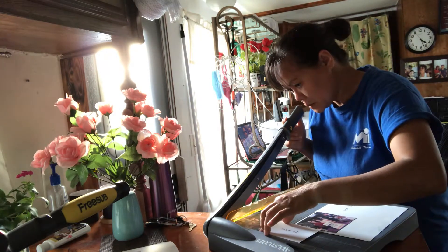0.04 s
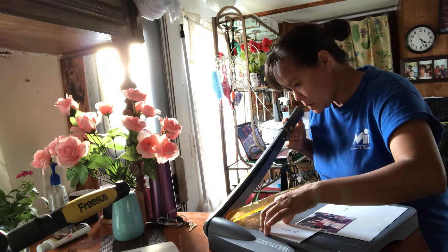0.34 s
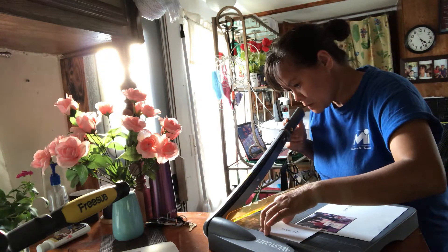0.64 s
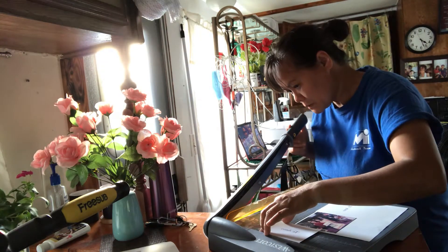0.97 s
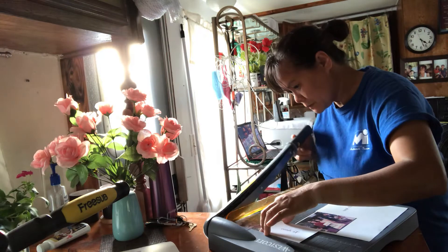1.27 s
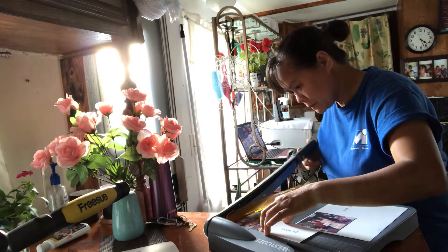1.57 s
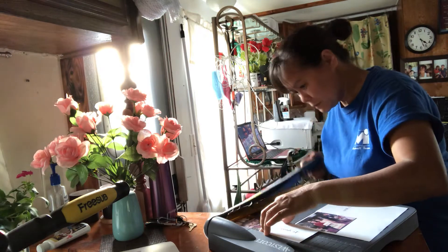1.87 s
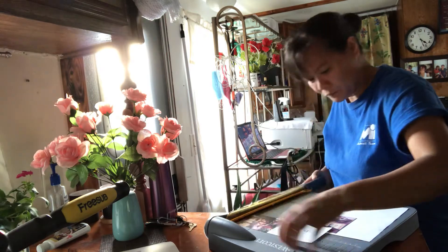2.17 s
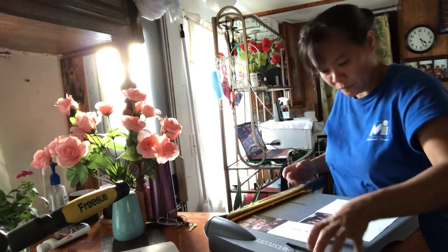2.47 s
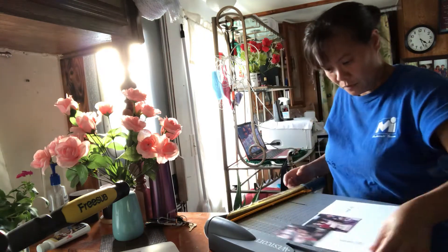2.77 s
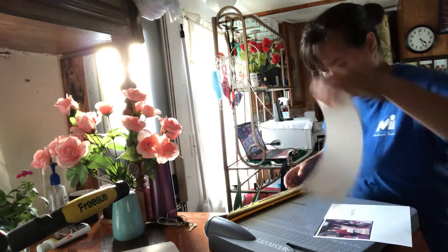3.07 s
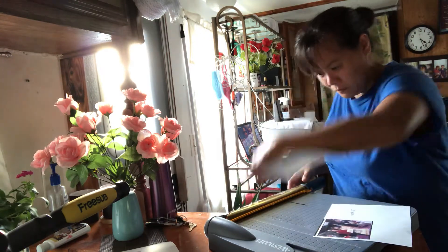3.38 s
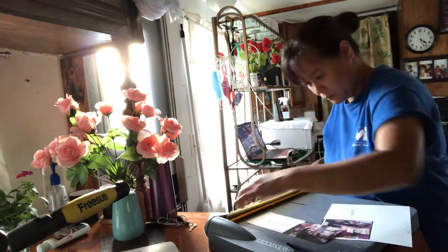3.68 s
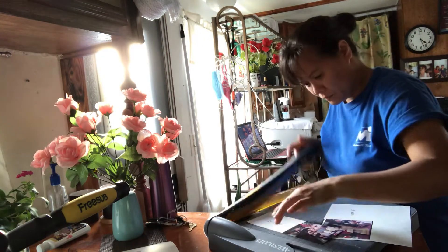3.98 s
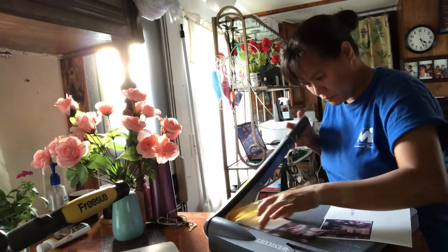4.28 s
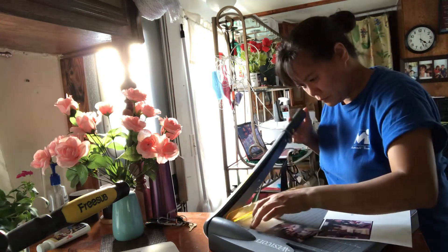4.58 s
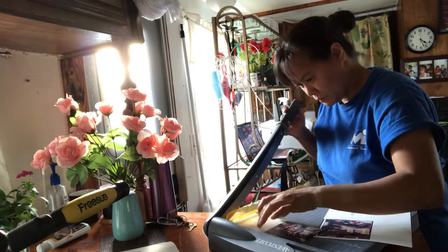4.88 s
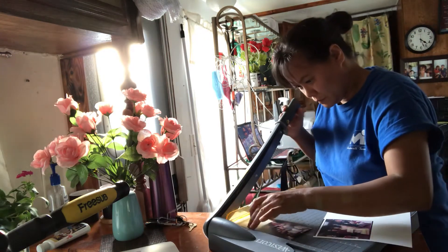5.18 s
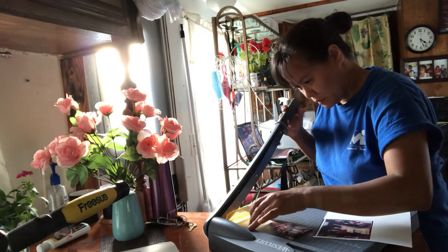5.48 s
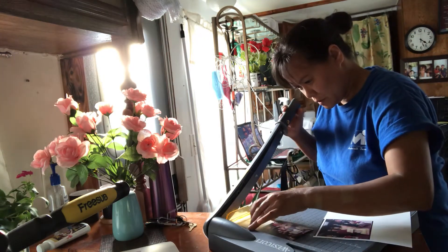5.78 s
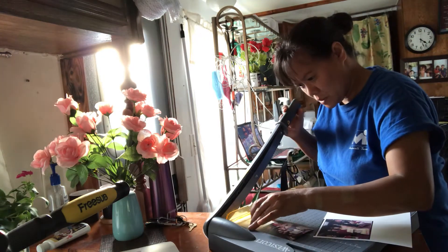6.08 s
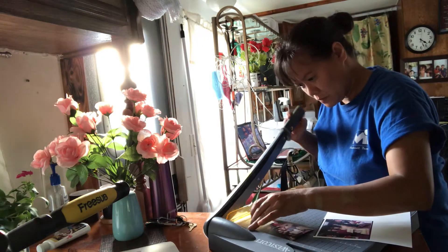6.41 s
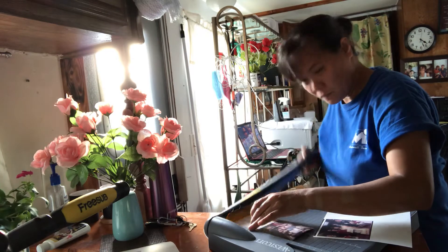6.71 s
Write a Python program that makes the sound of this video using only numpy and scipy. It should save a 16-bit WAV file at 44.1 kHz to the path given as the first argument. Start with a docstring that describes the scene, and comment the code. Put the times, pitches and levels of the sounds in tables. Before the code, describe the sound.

Paper crunches softly under a trimmer blade that squeaks and bangs shut twice, with a sheet sliding in between, in a quiet room.

```python
"""Guillotine paper trimmer, two cuts

A trimmer on a wooden table in a small, quiet room. Paper fibres snap under the blade and ring the
plastic bed; then steel scrapes and squeals on steel and the arm slams on its stop. Between the cuts
a sheet slides away, the arm is raised and small knocks sound as the next sheet is lined up."""
import sys
import numpy as np
from scipy import signal
from scipy.fft import rfft, irfft, next_fast_len
from scipy.io import wavfile

SR = 44100
rng = np.random.default_rng(int(sys.argv[2]) if len(sys.argv) > 2 else 0)


def log_audio(samples):
    """Write samples as a 16-bit WAV file to the path given in sys.argv[1]."""
    # one column per channel
    frames = np.atleast_2d(samples).T
    # limit to full scale, then quantise
    limited = np.clip(frames, -1, 1)
    pcm = np.round(limited * 32767).astype(np.int16)
    wavfile.write(sys.argv[1], SR, pcm)


N = 302085
T = np.arange(N) / SR
HIT_T = T[:SR // 2]  # half a second for each one-shot
FREQS = np.maximum(np.arange(8193) * SR / 16384, 1)

# Blade shearing paper: start_s, attack_s, length_s, level_db, rise_db, treble_db
CUT_STROKES = [(0.72, 0.087, 0.36, -51.5, -6.5, -7.5), (1.012, 0.12, .55, -41.5, 9, -8.5),
               (1.725, 0.015, .078, -36, 2, -4.5), (6.427, 0.014, 0.27, -40.5, 14.5, -4)]
# Raised or poised blade brushing the bed: start_s, attack_s, length_s, level_db, rise_db, treble_db
BRUSH_STROKES = [(3.948, 0.028, 0.32, -50.5, -13, -13.5), (4.275, 0.027, 0.1, -53.5, -7, -12),
                 (4.47, 0.076, 0.24, -60, 4, -18), (6.275, 0.035, .15, -67, 2, -3)]
# Steel edge on the steel bar: start_s, attack_s, length_s, level_db, rise_db, treble_db
SCRAPE_STROKES = [(1.854, 0.017, 0.17, -46.5, 8, -8), (2.005, 0.026, 0.096, -35, 6, -2),
                  (3.571, 0.0086, 0.053, -44, -9.5, -6), (3.735, 0.034, 0.12, -39, 11.5, -2),
                  (3.889, 0.023, 0.05, -46.5, 13.5, -10), (6.745, 0.022, .085, -37, -3, 5.5)]
# Squeals of the edge: start_s, length_s, first_hz, last_hz, level_db
EDGE_SQUEALS = [(1.92, .018, 1870, 1920, -40.5), (1.945, 0.019, 1960, 2000, -37),
                (1.991, .035, 1850, 1950, -44.5), (2.028, .05, 1560, 1635, -36),
                (2.029, .022, 4004, 3980, -33), (2.065, .036, 2150, 2145, -31),
                (3.572, 0.028, 903, 913, -36), (3.571, 0.017, 1850, 1920, -33),
                (3.761, 0.04, 893, 890, -35.5), (3.844, 0.028, 1882, 1950, -29),
                (6.76, 0.026, 1910, 1710, -24.5), (6.775, .026, 4330, 4210, -29),
                (6.781, 0.025, 1480, 1450, -24.5), (6.804, 0.032, 1080, 950, -31)]
# Arm hitting its stop and rattling: start_s, crack_db, thud_db, crack_rise_s
ARM_HITS = [(2.096, -13.5, -20.5, 0.0012), (2.108, -24, -20, 0.0058), (2.13, -18, -25.5, .004),
            (2.175, -47, -35, 0.0053), (2.228, -63, -43.5, .006), (6.833, -13.5, -17.5, 0.00042)]
# Fingers, sheet and hinge: start_s, level_db, tilt_db_per_octave, t60_s, hum_db
LIGHT_KNOCKS = [(1.844, -23, -2.5, 0.026, -51), (2.47, -26, -5.5, 0.035, -58),
                (3.113, -40.5, -8, 0.042, -76.5), (3.134, -39, -7, 0.03, -82),
                (3.307, -39.5, -10, 0.047, -78), (3.577, -38.5, 7, 0.039, -52.5),
                (3.619, -45, 6, 0.15, -57), (3.725, -44, 2, 0.12, -51), (4.126, -29.5, -2.5, 0.051, -44.5),
                (4.282, -30.5, -1.5, 0.039, -44), (4.366, -36.5, -14, 0.035, -67),
                (4.415, -39.5, -0.5, 0.077, -59), (4.661, -29, 6, 0.095, -46.5),
                (4.967, -55.5, -10, 0.33, -76), (5.285, -56, -7.5, 0.12, -78)]
# Crisp paper ticks: start_s, level_db, centre_hz, t60_s
PAPER_TICKS = [(0.984, -59, 14000, .08), (4.39, -65, 11000, .04), (5.477, -57, 6100, 0.062)]
# Sheet sliding over the bed: fastest_s, half_length_s, level_db, treble_db
SHEET_SLIDES = [(2.63, 0.11, -57, 7.5), (2.842, .055, -54, -9.5), (2.942, .05, -59.5, -5.5),
                (3.084, .028, -57, -18), (3.454, 0.22, -69, -19), (4.262, 0.14, -66.5, 1.5),
                (4.577, 0.067, -73, 1), (4.988, 0.11, -72.5, 5.5)]
# Distant noise dying away: time_s, rumble_db, rush_db
DISTANT_FADE = [(0, -49, -59.5), (2.5, -58, -62), (4.6, -61, -66), (6.85, -62.5, -79.5)]

# Resonances of the bed, the blade and the knocked shell: centre_hz, width_hz, level_db
BED_RESONANCES = [(344.7, 28, 2), (678, 35, 3), (882, 6.8, 0.5), (1456, 124, -6.5), (1797, 97, -6.5),
                  (2310, 65, -10), (2704, 57, -10.5), (3088, 145, -11.5), (3860, 85, -10), (4390, 240, -17),
                  (5530, 62, -15), (5980, 220, -15.5), (6230, 26, -20), (6590, 37, -13.5), (7080, 170, -20),
                  (7670, 50, -21), (8050, 50, -26)]
BLADE_RESONANCES = [(724, 20, -1.5), (1114, 74, -0.5), (1473, 28, -1), (1780, 62, -2.5), (1833, 67, 0.5),
                    (2220, 29, -4), (2418, 53, -5), (2830, 45, -5), (3200, 67, -9), (3770, 45, -18.5),
                    (3820, 53, -21.5), (3970, 38, -6.5), (4450, 65, -12), (5720, 26.6, -11.5),
                    (5930, 28.5, -23.5), (7120, 96.4, -17.5)]
SHELL_RESONANCES = [(662, 40, -6), (937, 14, -6.5), (1087, 110, -4.5), (1535, 70, 4), (1870, 110, -3),
                    (2175, 32, -20), (2885, 150, -9), (3486, 480, -10), (4170, 150, -12),
                    (4340, 180, -16.5), (6020, 160, -16), (6760, 61, -21.5)]
# Ring of the trimmer frame and of the table under it: pitch_hz, level_db, t60_s
FRAME_RING = [(362, 0, 0.24), (514, -1.5, 0.28), (681, -13, 0.62), (890, -12, 0.19), (1089, -7.5, 0.2),
              (1387, -2.5, 0.18), (1530, -2.5, 0.12), (1590, -16.5, 0.23), (1858, -7.5, 0.11),
              (2024, -21, 0.53), (2800, -15.5, 0.19), (2927, -21.5, 0.238), (3095, -22.5, 0.237),
              (3360, -9.5, 0.1), (3830, -8, 0.088), (4296, -9, 0.152), (3850, -16, 0.074), (4383, -17, 0.1)]
TABLE_RING = [(111, -8, 0.53), (223.4, -16, 0.64), (432, -11.5, 0.42)]
# Notes of the hollow bed: pitch_hz, level_db, time_to_peak_s
HOLLOW_NOTES = [(476, -4, 0.046), (540, 0.5, 0.042), (655, 1, 0.029), (732, -1, 0.013), (914, 1.5, 0.013)]

# Broad tone curve of each layer: frequency_hz, gain_db
CUT_EQ = [(71, -28), (120, -31), (255, -20), (346, -6), (459, -6), (649, -7), (812, -14), (899, -7),
          (1240, -14.5), (1460, -20.5), (2290, -14.5), (4960, -25), (6080, -26.5), (15500, -37.5)]
BLADE_EQ = [(88, -56.5), (150, -14.5), (668, -1), (812, -13), (894, -4.5), (1340, -4), (1870, -4.5),
            (3040, -8.5), (4060, -12), (4930, -16.5), (6730, -17.5), (8490, -27.5), (15500, -35.5)]
CRACK_EQ = [(150, -16), (600, 0.5), (1100, -4.5), (1650, 2), (2500, -8), (3600, -7), (5200, -21),
            (7000, -21.5), (10000, -34.5), (15000, -38.5)]
THUD_EQ = [(22, -42), (45, -13.5), (70, -11.5), (120, -11), (180, -18), (340, 5), (480, -5.5), (650, 6.5),
           (800, -7), (1000, 1), (2000, -24.5), (5000, -32.5), (15000, -55)]
SHELL_EQ = [(100, -34), (350, -13.5), (700, -5.5), (1500, -3.5), (2500, -7), (4200, -12.5), (7000, -25),
            (15000, -36)]
PAPER_EQ = [(300, -17), (700, -13.5), (1100, -6.5), (2000, -7.5), (4000, 1.5), (6500, 6), (10000, -1),
            (15500, 2)]
AIR_EQ = [(15, -49.5), (25, -9.5), (36, -18.5), (59, -2.5), (91, -28.5), (113, -10), (178, -20),
          (281, -13.5), (495, -28), (537, -21), (703, -31), (848, -25.5), (1750, -33.5), (2700, -34.5),
          (15500, -52.5)]
RUSH_EQ = [(100, -3.5), (220, 12), (330, -0.5), (700, -0.5), (1400, 0), (2300, -10.5), (5000, -27.5),
           (15000, -39)]
RUMBLE_EQ = [(25, -35), (45, -5), (62, 5), (90, -1), (155, -6), (210, -10), (350, -33), (1000, -63.5)]


def shearing():
    """Fibres snap in uneven bunches under the blade and ring the bed."""
    snaps = grains(per_s=4000, spread_db=3.5) + amp(-6) * rng.standard_normal(N)
    snaps *= amp(0.26 * drift(170))
    bed = equalise(snaps, body(BED_RESONANCES, CUT_EQ, broad_db=1))
    crunch = shift_timbre(bed, per_s=40, depth_db=1.87)
    return play_strokes(crunch, CUT_STROKES + BRUSH_STROKES, split_hz=1260, t60=0.18, brighten=0.28)


def scraping():
    """Steel sticks and slips on steel, ringing the blade."""
    slips = grains(per_s=3500, spread_db=1) + amp(-4.5) * rng.standard_normal(N)
    slips *= amp(0.2 * drift(130))
    blade = equalise(slips, body(BLADE_RESONANCES, BLADE_EQ, broad_db=-5.5))
    rasp = shift_timbre(blade, per_s=50, depth_db=3.5)
    return play_strokes(rasp, SCRAPE_STROKES, split_hz=2580, t60=0.17, brighten=0.57)


def squealing():
    """The slips lock into a rough note that glides as the contact point travels."""
    out = np.zeros(N)
    waver = 1 + .03 * drift(700)
    flutter = unit(amp(3 * drift(260)))
    for start, length, first_hz, last_hz, db in EDGE_SQUEALS:
        hz = np.interp(T, [start, start + length], [first_hz, last_hz]) * waver
        locked = soft_gate(start, length, edge_s=.008)
        out += amp(db) * locked * np.sin(2 * np.pi * np.cumsum(hz) / SR)
    return out * flutter


def slamming():
    """The arm cracks on its stop and rattles; the frame rings and the table answers with a thud."""
    out = np.zeros(N)
    crack_tone = curve(CRACK_EQ)
    for start, crack_db, thud_db, rise_s in ARM_HITS:
        crack = burst(crack_tone, t60=0.054) + amp(-8.5) * burst(crack_tone, t60=0.131)
        thud = amp(2) * burst(curve(THUD_EQ), t60=0.15)
        frame = amp(-15) * ring(FRAME_RING)
        table = amp(-3) * swell(0.035) * ring(TABLE_RING)
        add(out, start, amp(crack_db) * swell(rise_s) * crack)
        add(out, start + .001, amp(thud_db) * (swell(0.0036) * (thud + frame) + table))
    return out


def knocking():
    """Light contacts clack on the trimmer; the hollow bed hums on after each."""
    out = np.zeros(N)
    shell = body(SHELL_RESONANCES, SHELL_EQ, broad_db=-1.5)
    treble_octaves = np.log2(np.clip(FREQS / 1000, 1, 6))
    for start, db, tilt, t60, hum_db in LIGHT_KNOCKS:
        clack = burst(shell * amp(tilt * treble_octaves), t60)
        modes = [(hz, peak_db + tilt * np.log2(hz / 1000), t60) for hz, _, peak_db in SHELL_RESONANCES]
        add(out, start, amp(db) * swell(0.0031) * (amp(-5) * clack + amp(-10) * ring(modes)))
        # Low bending waves travel slowest, so the deeper notes bloom later.
        for hz, note_db, peak_s in HOLLOW_NOTES:
            bloom = (HIT_T / peak_s * np.exp(1 - HIT_T / peak_s)) ** 2
            add(out, start, amp(hum_db + note_db) * bloom * tone(hz))
    return out


def ticking():
    """The paper gives crisp little ticks, each a band of high noise."""
    out = np.zeros(N)
    for start, db, hz, t60 in PAPER_TICKS:
        band = 1 / (1 + (3 * (FREQS - hz) / hz) ** 4)
        add(out, start, amp(db) * swell(0.002) * burst(band, t60))
    return out


def sliding():
    """Paper drags over the bed: fine grit and hiss that swell and ebb with the speed of the hand."""
    rub = grains(per_s=3700, spread_db=5.5) + rng.standard_normal(N)
    rub *= amp(1.5 * drift(60))
    low, high = crossover(equalise(rub, curve(PAPER_EQ)), split_hz=3340)
    out = np.zeros(N)
    for fastest_s, half_s, db, treble_db in SHEET_SLIDES:
        speed = np.exp(-((T - fastest_s) / half_s) ** 2)
        out += speed * amp(db) * (low + amp(treble_db) * high)
    return out


def room_reverb(x, wet_db, t60, dull_hz):
    """A furnished room: dense, short reflections with dulled treble."""
    tail = rng.standard_normal(len(HIT_T)) * decay(HIT_T, t60) * (HIT_T > .004)
    tail /= np.sqrt(np.sum(tail ** 2))
    tail = signal.sosfilt(signal.butter(1, dull_hz, fs=SR, output="sos"), tail)
    wet = amp(wet_db) * signal.fftconvolve(x, tail)[:N]
    return (x + wet) / np.hypot(1, amp(wet_db))


def room_tone():
    """Room air and mains hum, with a distant rush and rumble that slowly die away."""
    times, rumble_db, rush_db = np.transpose(DISTANT_FADE)
    air = noise(AIR_EQ) * amp(-59.5 + .5 * drift(6.1))
    hum = np.sin(2 * np.pi * 60 * T) * amp(-63.5 + 2.3 * drift(4.3))
    rush = noise(RUSH_EQ) * amp(np.interp(T, times, rush_db) + .5 * drift(14))
    rumble = noise(RUMBLE_EQ) * amp(np.interp(T, times, rumble_db) + 0.64 * drift(12))
    return air + hum + rush + rumble


def play_strokes(friction, strokes, split_hz, t60, brighten):
    """Each stroke bites, follows the force on the arm in level and brightness, then dies away."""
    low, high = crossover(friction, split_hz)
    out = np.zeros(N)
    for start, attack_s, length, db, rise_db, treble_db in strokes:
        t = T - start
        force_db = rise_db * (np.clip(t / length, 0, 1) - .5)
        contact = np.clip(t / attack_s, 0, 1) * decay(np.clip(t - length, 0, 1), t60)
        treble = amp(treble_db + brighten * force_db)  # brighten: dB of treble per dB of force
        out += contact * amp(db + force_db) * (low + treble * high)
    return out


def shift_timbre(x, per_s, depth_db):
    """As the contact point travels, each half octave is driven more or less strongly."""
    size = next_fast_len(N)
    spectrum = rfft(x, size)
    hz = np.maximum(np.arange(len(spectrum)) * SR / size, 1)
    half_octaves = np.clip(2 * np.log2(hz / 500), 0, 9)
    out = np.zeros(N)
    for band in range(10):
        weight = np.maximum(1 - np.abs(half_octaves - band), 0)
        out += irfft(spectrum * weight, size)[:N] * amp(depth_db * drift(per_s))
    return out


def crossover(x, split_hz):
    """Body and treble of a friction sound, each at rms 1."""
    low = signal.sosfiltfilt(signal.butter(2, split_hz, fs=SR, output="sos"), x)
    return unit(low), unit(x - low)


def grains(per_s, spread_db):
    """Randomly timed tiny snaps of uneven size."""
    snaps = (rng.random(N) < per_s / SR) * rng.choice([-1, 1], N)
    return unit(snaps * amp(spread_db * np.clip(rng.standard_normal(N), -2, 2)))


def burst(gain, t60):
    """One contact: a crowd of quickly dying vibrations, rms 1 over its first 10 ms."""
    x = equalise(rng.choice([-1, 1], len(HIT_T)) * decay(HIT_T, t60), gain)
    return x / np.sqrt(np.mean(x[:SR // 100] ** 2))


def ring(modes):
    """The decaying notes of a struck body."""
    return sum(amp(db) * decay(HIT_T, t60) * tone(hz) for hz, db, t60 in modes)


def tone(hz):
    """A short sine at a random phase."""
    return np.sin(2 * np.pi * (hz * HIT_T + rng.random()))


def noise(eq):
    """Steady coloured noise at rms 1."""
    return unit(equalise(rng.standard_normal(N), curve(eq)))


def drift(per_s):
    """Smooth random modulation at rms 1."""
    values = rng.standard_normal(8192)
    return unit(np.interp(T * per_s, np.arange(len(values)), values))


def body(peaks, eq, broad_db):
    """Resonances standing over a broad tone curve."""
    power = sum(amp(db) ** 2 / (1 + (2 * (FREQS - hz) / width) ** 2) ** 2 for hz, width, db in peaks)
    return np.sqrt(power + (amp(broad_db) * curve(eq)) ** 2)


def curve(eq):
    """Gain at each frequency, drawn through the EQ points."""
    hz, db = np.transpose(eq)
    return amp(np.interp(np.log(FREQS), np.log(hz), db))


def equalise(x, gain):
    """Minimum-phase EQ: nothing rings ahead of the attack."""
    cepstrum = irfft(np.log(gain + 1e-6))
    half = len(cepstrum) // 2
    fold = np.r_[1, np.full(half - 1, 2), np.zeros(half)]
    impulse = irfft(np.exp(rfft(cepstrum * fold)))[:half]
    return signal.fftconvolve(x, impulse)[:len(x)]


def soft_gate(start, length, edge_s):
    """Smooth fade in, hold and fade out."""
    ramp = np.clip(np.minimum(T - start, start + length - T) / edge_s, 0, 1)
    return np.sin(np.pi / 2 * ramp) ** 2


def swell(rise_s):
    """Vibration takes a moment to spread through the body."""
    return 1 - np.exp(-HIT_T / rise_s)


def decay(t, t60):
    """Fall by 60 dB every t60 seconds."""
    return np.exp(-np.log(1000) * t / t60)


def add(out, start_s, x):
    """Mix a sound in on its cue."""
    start = int(start_s * SR)
    out[start:start + len(x)] += x[:max(N - start, 0)]


def amp(db):
    """Decibels to gain."""
    return 10 ** (np.asarray(db) / 20)


def unit(x):
    """Scale to rms 1."""
    return x / np.sqrt(np.mean(x ** 2))


def scene():
    """Trimmer and paper in a short reverb, over room tone, in mono."""
    trimmer = shearing() + scraping() + squealing() + sliding() + slamming() + knocking() + ticking()
    return (room_reverb(trimmer, wet_db=-7, t60=0.16, dull_hz=7500) + room_tone())[None]


def record(dry):
    """Soft saturation rounds the loudest peaks; a steep low-pass cuts the top."""
    top_hz = 15850
    rounded = np.tanh(1.247 * dry) / 1.41
    return signal.sosfilt(signal.ellip(10, .2, 70, top_hz, fs=SR, output="sos"), rounded)


dry = scene()
out = record(dry)
log_audio(out)
```